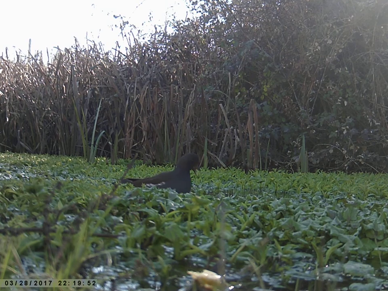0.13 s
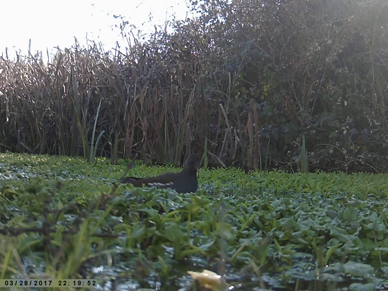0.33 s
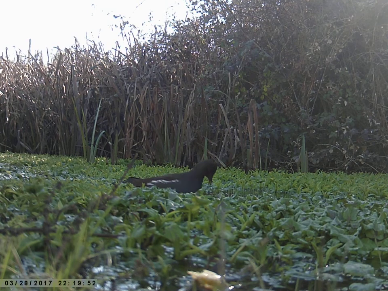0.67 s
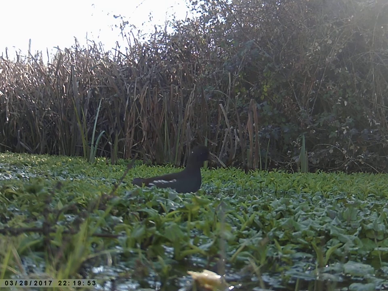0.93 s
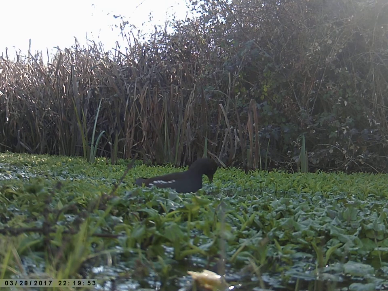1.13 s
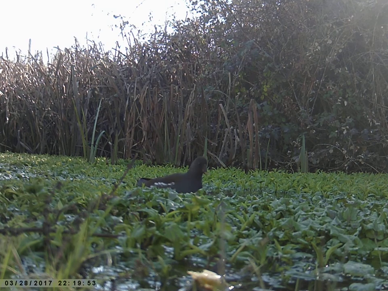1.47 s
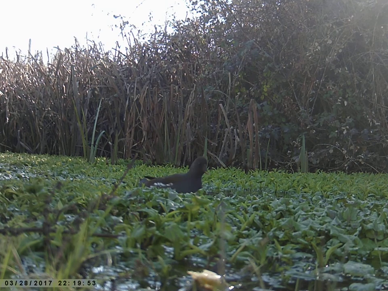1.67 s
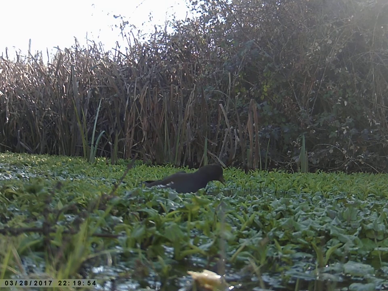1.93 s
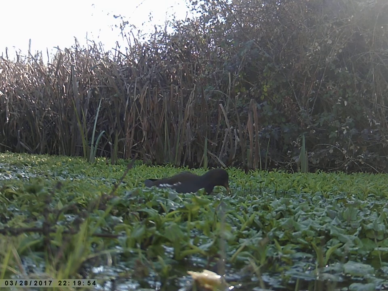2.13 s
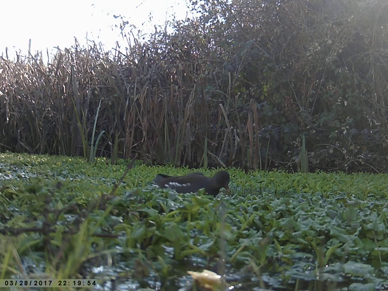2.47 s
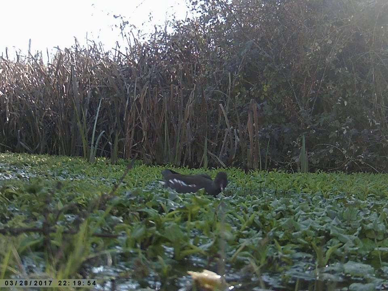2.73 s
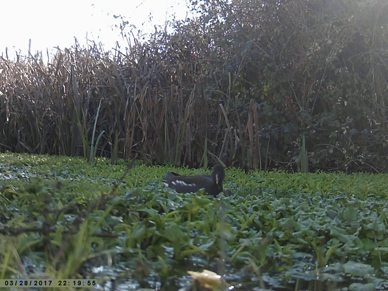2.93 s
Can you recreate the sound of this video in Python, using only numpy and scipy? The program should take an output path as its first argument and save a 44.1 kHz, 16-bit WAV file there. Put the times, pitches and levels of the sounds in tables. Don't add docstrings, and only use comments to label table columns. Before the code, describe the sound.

A close bird gives a raspy rising call, a whistle and a bend, then three chirps, a pause, another chirp and a long harsh call; engine drone, wind, hiss and thumps from a small camera microphone.

```python
import sys
import numpy as np
from scipy import signal
from scipy.fft import rfft, irfft
from scipy.io import wavfile
from scipy.ndimage import uniform_filter1d

SR = 44100
rng = np.random.default_rng(int(sys.argv[2]) if len(sys.argv) > 2 else 0)


def wrap_up_sound(samples):
    columns = np.atleast_2d(samples).T
    tamed = np.clip(columns, -1, 1)
    steps = np.round(tamed * 32767).astype(np.int16)
    wavfile.write(sys.argv[1], SR, steps)


def rack_gain(trim_db):
    fader = np.asarray(trim_db, float)
    return 10 ** (fader / 20)


N = 136710

# (f/Hz, level/dB per Hz)
WIND = [(20, -2), (60, 1), (130, -6), (300, -11), (700, -18.5), (1500, -28.5), (4000, -49)]


def read(points, hz):
    f, value = np.transpose(points)
    return np.interp(np.log(abs(hz) + 1), np.log(f + 1), value)


def curve(points, t, col=1):
    rows = np.array(points, float)
    return np.interp(t, rows[:, 0], rows[:, col])


def drift(n, seconds):
    size = max(int(seconds * SR), 2)
    noise = rng.standard_normal(n + 4 * size)
    smooth = uniform_filter1d(uniform_filter1d(noise, size), size)
    return smooth[2 * size:][:n] * np.sqrt(1.5 * size)


def coloured(spectrum):
    gain = rack_gain(read(spectrum, np.fft.rfftfreq(N, 1 / SR)))
    noise = irfft(rfft(rng.standard_normal(N)) * gain, N)
    return noise / noise.std()


def tones(lines, waver_hz, waver_db, seconds):
    t = np.arange(N) / SR
    total = np.zeros(N)
    for hz, db in lines:
        level = rack_gain(db + waver_db * drift(N, seconds))
        turns = hz * t + np.cumsum(waver_hz * drift(N, seconds)) / SR + rng.random()
        total += np.sqrt(2) * level * np.sin(2 * np.pi * turns)
    return total


def add(mix, s, sound):
    part = mix[round(s * SR):][:len(sound)]
    part += sound[:len(part)]


def echoed(x, db, t60):
    t = np.arange(int(0.3 * SR)) / SR
    tail = rng.standard_normal(len(t)) * rack_gain(-60 * t / t60) * (t > 0.006)
    return x + rack_gain(db) * signal.fftconvolve(x, tail / np.linalg.norm(tail))[:N]


def camera_hiss():
    # (f/Hz, level/dB per Hz)
    hiss_colour = [(900, -7.5), (1600, -7.5), (4000, -5.5), (7000, -7), (15500, -18.5)]
    # (f/Hz, level/dB)
    whine = [(5700, -98.5), (6500, -103.5)]
    hiss = coloured(hiss_colour) * rack_gain(-75.5 + 2.0 * drift(N, 0.025))
    return hiss + tones(whine, waver_hz=26.4, waver_db=-0.5, seconds=0.008)


def supply_sags():
    # (dip t/s, rebound after/s, dip level/dB, rebound level/dB)
    sags = [(0.143, 0.071, -43, -41.5), (0.261, 0.048, -44.5, -42.5), (0.537, .068, -42, -42.5),
            (0.802, 0.069, -44.5, -40.5), (1.2, 0.073, -43, -42.5), (1.332, 0.025, -46.5, -55),
            (1.469, 0.041, -44.5, -45.5), (1.882, 0.042, -48, -46), (2.142, 0.046, -46.5, -46),
            (2.257, 0.026, -47, -49), (2.53, 0.048, -45.5, -46.5), (2.795, 0.054, -47, -47)]
    dip_s, rebound_s, buzz_s = 0.0056, 0.012, 0.0077
    t, thump, stir = np.arange(N) / SR, np.zeros(N), np.zeros(N)
    for s, gap, dip_db, rebound_db in sags:
        dip = np.exp(-((t - s) / dip_s) ** 2)
        rebound = np.exp(-((t - s - gap) / rebound_s) ** 2)
        thump += rack_gain(rebound_db) * rebound - rack_gain(dip_db) * dip
        stir += rack_gain(dip_db + 43.0) * (dip + 0.43 * rebound)
    keep = np.exp(-1 / (buzz_s * SR))
    stir = signal.lfilter([1 - keep], [1, -keep], stir) * rack_gain(1) * 2
    return thump - uniform_filter1d(thump, int(0.25 * SR)), stir


def wind(bird):
    open_db, open_at_db, open_s = 7.5, -46.5, 0.028
    size = int(open_s * SR)
    power = abs(uniform_filter1d(uniform_filter1d(bird ** 2, size), size))
    gate = rack_gain(open_db * power / (power + rack_gain(2 * open_at_db)))
    return coloured(WIND) * rack_gain(-59.5 + 1 * drift(N, 0.025)) * gate


def steady_drone():
    # (f/Hz, level/dB)
    hum = [(176.5, -70), (352, -81.5)]
    return tones(hum, waver_hz=0.88, waver_db=2.0, seconds=0.05)


def engine():
    # (t/s, firing f/Hz, level/dB)
    running = [(0.0, 113.7, -61), (0.01, 109.8, -64), (0.3, 109.6, -55), (0.69, 108.4, -61.5),
               (0.85, 108.4, -61), (0.88, 108.5, -49), (0.9, 108.7, -79), (0.93, 108.6, -59.5),
               (1.19, 108.5, -60), (2.02, 108.8, -56.5), (2.08, 107.9, -53), (2.62, 108.7, -61.5),
               (2.62, 108.4, -63), (2.71, 109, -59), (3.01, 108.2, -61), (3.1, 112, -56)]
    orders = [-0.5, -9.5, -17, -18.5]
    t = np.arange(N) / SR
    turns = np.cumsum(curve(running, t) + 0.9 * drift(N, 0.034)) / SR
    total = np.zeros(N)
    for k, db in enumerate(orders, 1):
        level = rack_gain(curve(running, t, col=2) + db + 1.07 * drift(N, 0.038))
        total += level * np.sin(2 * np.pi * (k * turns + rng.random()))
    return np.sqrt(2) * total


def far_birds():
    # (start t/s, length/s, level/dB, first f/Hz, last f/Hz)
    peeps = [(0.6, 0.042, -68.5, 5300, 4720), (0.87, 0.015, -72, 6600, 6500), (1.104, .02, -77, 6400, 6300),
             (0.863, 0.022, -65, 4970, 5240), (2.718, 0.026, -77, 2370, 2690),
             (2.77, 0.016, -77, 4702, 4930), (2.928, 0.026, -75, 4000, 3746),
             (0.848, 0.02, -65, 2500, 2990), (1.105, 0.018, -67.5, 4740, 4820),
             (1.308, 0.09, -71.5, 4006, 3910), (1.657, 0.027, -71.5, 2910, 3150),
             (1.83, 0.028, -72, 2640, 3260), (2.344, 0.021, -73.5, 2570, 2880),
             (2.943, 0.028, -70.5, 5600, 5960), (2.883, 0.033, -67.5, 5030, 5530),
             (2.898, 0.039, -68, 3790, 4040), (2.947, 0.039, -74.5, 2660, 2970),
             (2.977, 0.039, -63.5, 6060, 4696), (3.006, 0.075, -73, 4580, 3460),
             (3.009, 0.04, -66.5, 2520, 3380), (0.362, 0.024, -66, 4610, 4830)]
    x = np.zeros(N)
    for s, length, db, first_hz, last_hz in peeps:
        u = np.arange(0, length, 1 / SR) / length
        hz = (first_hz + (last_hz - first_hz) * u) * (1 + 0.006 * drift(len(u), 0.003))
        flutter = rack_gain(2.5 * drift(len(u), 0.004)) * np.sin(np.pi * u) ** 0.7
        add(x, s, rack_gain(db) * flutter * np.sin(2 * np.pi * np.cumsum(hz) / SR))
    return echoed(x, db=-15, t60=0.15)


def sing(mix, low, high, mixed_db, shown=1, extra=(), harsh_db=0, harsh_s=1, share=1, raspy=False):
    # (f/Hz, level/dB)
    throat = [(1700, -19.5), (2700, -2), (4200, 0.5), (5300, -5.5), (7000, -9.5), (8500, -10), (9400, -25),
              (11000, -36)]
    pairs = [(2, 0), (1, 1), (-1, 2), (2, -1), (0, 2), (3, 0), (2, 1), (-2, 3), (1, 2), (0, 3), (1, 0),
             (4, -1)]
    voices = [low, low if high is None else high]
    begin = min(v[0][0] for v in voices) - 0.004
    end = max(v[-1][0] for v in voices) + 0.004
    t = np.arange(begin, end, 1 / SR)
    turn, shut, effort = [], [], []
    for v, multiple in zip(voices, (shown, 1)):
        hz = uniform_filter1d(curve(v, t), 80) * (1 + 0.0022 * drift(len(t), 0.00088))
        closing = -12000 * (np.maximum(v[0][0] - t, 0) + np.maximum(t - v[-1][0], 0))
        level = uniform_filter1d(curve(v, t, col=2) + closing, 40)
        turn.append((hz, 2 * np.pi * (np.cumsum(hz) / SR + rng.random())))
        shut.append(closing)
        effort.append(level - read(throat, multiple * hz))
    (low_hz, low_turn), (high_hz, high_turn) = turn
    harsh = harsh_db * np.exp(-((t - t[0]) / harsh_s) ** 4)

    partials = [(shown, 0, 0, 1)]
    if high is not None:
        partials.append((0, 1, 0, 1))
    partials += [(m, n, db, share) for (m, n), db in zip(pairs, mixed_db)]
    partials += [(m, n, db, 1) for m, n, db in extra]
    out = np.zeros(len(t))
    for m, n, db, lift in partials:
        if n == 0:
            level = effort[0]
        elif m == 0:
            level = effort[1]
        else:
            level = (effort[0] + effort[1]) / 2 + 0.5 * (shut[0] + shut[1])
        rough = (2.2 * drift(len(t), 0.0032) + harsh * lift) * (db != 0)
        phase = m * low_turn + n * high_turn + 2 * np.pi * rng.random()
        out += rack_gain(level + db + rough + read(throat, m * low_hz + n * high_hz)) * np.cos(phase)
    rasp = rack_gain(-15.5 + 0.34 * harsh) * drift(len(t), 0.00055) * raspy
    add(mix, t[0], np.sqrt(2) * out * (1 + rasp))


def note(start, length, db, hz, drop, peak, hook=0):
    settle_s, edge_db = 0.008, -21
    u = np.linspace(0, 1, 13)
    pitch = hz * (1 + drop * (np.exp(-u * length / settle_s) + hook * u ** 2))
    from_peak = abs(u - peak) / np.where(u < peak, peak, 1 - peak)
    return list(zip(start + u * length, pitch, db + edge_db * from_peak ** 2.24))


def chirps(mix):
    # (start t/s, length/s, low level/dB, low f/Hz, high level/dB)
    pips = [
        (0.721, 0.032, -46, 5960, -60.5),
        (0.835, 0.033, -47.5, 4865, -50),
        (0.946, 0.035, -47.5, 4853, -48.5),
        (1.879, 0.043, -42.5, 5180, -49.5),
    ]
    high_pitch = [7040, 5550, 5580, 5630]
    drops = [0.066, 0.22, 0.15, 0.065]
    peaks = [0.71, 0.43, 0.43, 0.51]
    mixes = [
        [-5, -8, -32, -36],
        [-1, -6, -28, -32],
        [-1, -7, -24, -28],
        [-6, -10, -20, -32],
    ]
    lag_s = 0.003
    for pip, high_hz, drop, peak, mixed in zip(pips, high_pitch, drops, peaks, mixes):
        s, length, db, hz, high_db = pip
        low = note(s, length, db, hz, drop, peak)
        high = note(s + lag_s, length - lag_s, high_db, high_hz, drop, peak, hook=0.36)
        sing(mix, low, high, mixed)


def whistles(mix):
    # (t/s, f/Hz, level/dB)
    whistle = [(0.302, 4500, -66), (0.315, 4480, -52), (0.326, 4430, -36), (.337, 4567, -36),
               (0.345, 4910, -55), (0.345, 4550, -44), (0.351, 3720, -67)]
    flick = [(2.2, 4080, -55), (2.206, 5300, -53), (2.216, 6615, -90)]
    slide = [(2.202, 2470, -67), (2.214, 3300, -43), (2.216, 3320, -52.5), (2.221, 5206, -55),
             (2.228, 4870, -40.5), (2.236, 5022, -36), (2.248, 5043, -41), (2.264, 4810, -64)]
    octave = [-26.5]
    for voice in (whistle, flick, slide):
        sing(mix, voice, None, octave)


def rising_call(mix):
    # (t/s, f/Hz, level/dB)
    low = [(0.215, 1640, -99), (0.225, 1737, -77.5), (0.235, 1870, -69), (0.243, 2195, -66.5),
           (0.252, 2576, -61), (.261, 2930, -51), (0.271, 3450, -46.5), (0.282, 3540, -53),
           (0.295, 3270, -46), (0.307, 3420, -52.5), (.316, 3700, -63)]
    high = [(0.212, 2163, -81), (0.222, 2255, -66), (0.239, 2810, -56.5), (0.251, 3260, -51),
            (0.268, 3790, -51), (.282, 3980, -50), (.291, 4170, -78)]
    mixed = [-6.5, -5.5, -15, -30, -7, -17, -8.5, -19, -14, -8.5]
    sing(mix, low, high, mixed, raspy=True, harsh_db=10, harsh_s=0.071)


def bending_call(mix):
    # (t/s, f/Hz, level/dB)
    low = [(0.371, 2240, -76), (0.384, 2680, -57.5), (0.4, 2570, -71)]
    high = [(0.377, 3900, -56), (0.393, 3654, -43), (0.41, 3950, -36.5), (0.417, 4170, -43),
            (.425, 4350, -76)]
    ending = [(.405, 2464, -75), (0.419, 2650, -50), (.431, 2955, -50.5), (.439, 2784, -56.5),
              (0.451, 3070, -75)]
    bend_mix = [3.5, -4, -7, -24, -23, -1]
    end_mix = [-8]
    sing(mix, low, high, bend_mix, raspy=True)
    sing(mix, ending, None, end_mix, extra=[(3 / 2, 0, -9)])


def long_call(mix):
    # (t/s, f/Hz, level/dB)
    low = [(2.029, 1655, -74), (2.046, 1809, -56.5), (2.055, 1992, -48), (2.066, 2046, -46),
           (2.095, 2065, -49.5), (2.121, 2068, -44.5), (2.147, 2166, -45.5), (2.173, 2212, -53),
           (2.181, 1950, -61)]
    high = [(2.031, 2800, -68), (2.052, 3284, -56.5), (2.077, 3215, -55.5), (2.11, 3207, -58),
            (2.13, 3364, -54), (2.167, 3414, -58), (2.173, 3310, -52), (2.18, 3800, -70)]
    mixed = [-64, -4, -41, -43, 0, -5, -21, -22, -39, -34, -19.5, -22]
    # (multiple of low, multiple of high, level/dB)
    spray = [(4, 0, -29), (7, -2, -24), (3, 1, -31), (5, 0, -31), (2, 2, -18), (4, 1, -12), (-1, 3, -27),
             (5, -1, -23), (6, -2, -26)]
    sing(mix, low, high, mixed, shown=2, raspy=True, harsh_db=19, harsh_s=0.029, share=0.48, extra=spray)


def near_bird():
    x = np.zeros(N)
    for call in (rising_call, whistles, bending_call, long_call, chirps):
        call(x)
    return x


def scene():
    bird = echoed(far_birds() + near_bird(), db=-25, t60=0.11)
    return (bird + steady_drone() + engine() + wind(bird))[None]


def low_pass(x):
    return signal.sosfilt(signal.butter(12, 15630, fs=SR, output="sos"), x)


def record(dry):
    thump, stir = supply_sags()
    loudness = abs(uniform_filter1d(abs(dry[0]), 300))
    grit = rack_gain(-49) * np.sqrt(loudness) * rng.standard_normal(N)
    jolt = rack_gain(-60) * stir * coloured(WIND)
    x = dry + thump + camera_hiss() * (1 + stir) + grit + jolt
    x = irfft(rfft(x) * (np.fft.rfftfreq(N, 1 / SR) < 15680), N)
    return low_pass(x)


dry = scene()
out = record(dry)
wrap_up_sound(out)
```